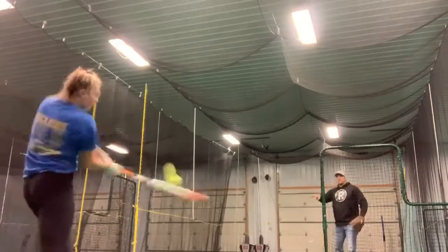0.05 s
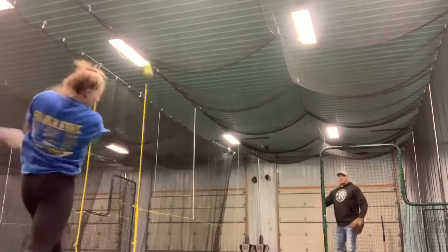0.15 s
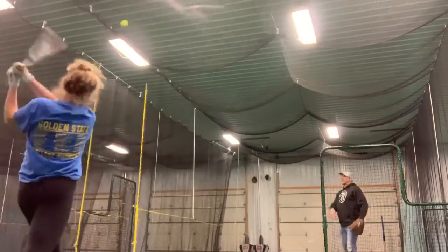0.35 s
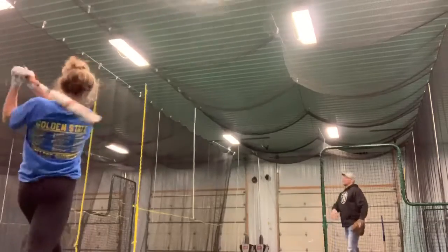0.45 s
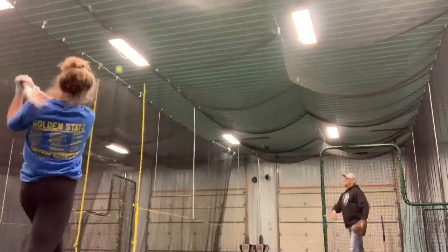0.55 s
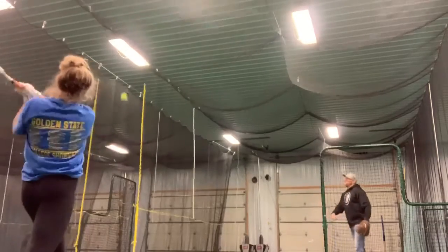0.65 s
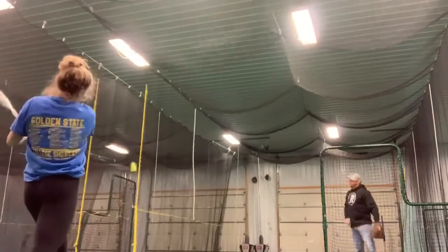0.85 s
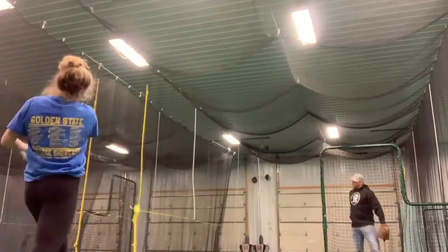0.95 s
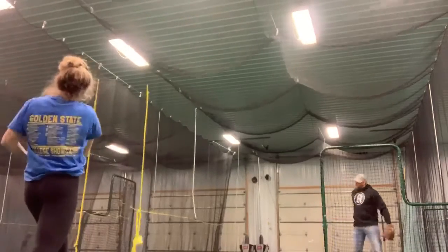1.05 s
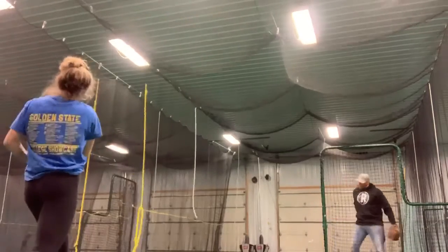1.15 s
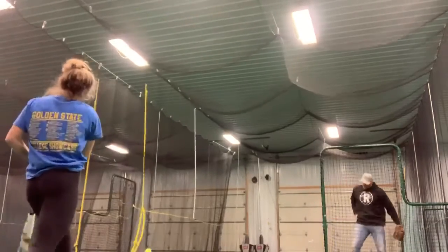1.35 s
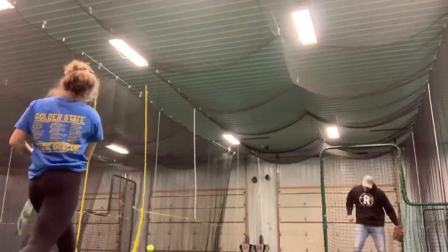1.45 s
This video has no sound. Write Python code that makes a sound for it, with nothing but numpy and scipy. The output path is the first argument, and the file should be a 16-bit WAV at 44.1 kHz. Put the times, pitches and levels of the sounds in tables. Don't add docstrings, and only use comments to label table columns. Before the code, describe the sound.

A bat cracks sharply against a ball in a large metal-walled hall, ringing with long echo

```python
import sys
import numpy as np
from scipy import signal
from scipy.io import wavfile
from scipy.ndimage import uniform_filter1d

SR = 44100
rng = np.random.default_rng(int(sys.argv[2]) if len(sys.argv) > 2 else 0)


def put_to_file(sound):
    columns = np.atleast_2d(sound).T
    safe = np.clip(columns, -1, 1)
    whole_steps = np.round(safe * 32767)
    wavfile.write(sys.argv[1], SR, whole_steps.astype(np.int16))


def elevation(decibels):
    levels = np.asarray(decibels, float)
    return 10 ** (levels / 20)


N = 66150
HIT_S = 0.2075


def rms_one(x):
    return x / np.sqrt(np.mean(x ** 2) + 1e-20)


def at_hz(points, hz):
    table = np.array(points)
    return np.interp(np.log(hz), np.log(table[:, 0]), table[:, 1])


def dying(start_s, rise_s, t60_s):
    t = np.maximum(np.arange(N) / SR - start_s, 0)
    return (1 - np.exp(-t / max(rise_s, 1e-5))) * elevation(-60 * t / t60_s)


def resonate(x, hz, width_hz):
    r = np.exp(-np.pi * width_hz / SR)
    top = np.array([1, 0, -1]) * (1 - r * r) / 2
    return signal.lfilter(top, [1, -2 * r * np.cos(2 * np.pi * hz / SR), r * r], x)


def resonant_noise(hz, width_hz):
    return rms_one(resonate(rng.standard_normal(N), hz, width_hz))


def focused(x, hz, width_hz):
    return rms_one(resonate(resonate(x, hz, width_hz), hz, 2 * width_hz))


def banded(spectrum, shape=lambda hz: 1):
    white = rng.standard_normal((2, N))
    edges = 22 * 2 ** np.arange(0, 9.1, 1 / 3)
    bands = []
    for k, (low, high) in enumerate(zip(edges, edges[1:])):
        hz = np.sqrt(low * high)
        sos = signal.butter(2, [low, high], "band", fs=SR, output="sos")
        bands.append((hz, elevation(at_hz(spectrum, hz)) * signal.sosfilt(sos, white[k % 2])))
    scale = np.std(sum(band for _, band in bands))
    return sum(band * shape(hz) for hz, band in bands) / scale


def struck(start_s, hz, t60_s, db, rise_s):
    return elevation(db) * dying(start_s, rise_s, t60_s) * np.sin(2 * np.pi * hz * (np.arange(N) / SR - start_s))


def bat():
    # pitch_hz [Hz], level_db [dB], t60_s [s]
    modes = [(99, -10.5, .06), (319, -4.5, 0.012), (576, -4, 0.011), (1084, -2.5, 0.033), (1417, -12, .02),
             (1860, -5.5, 0.029), (2340, -10.5, 0.033), (2770, -8.5, 0.018), (800, -22, 0.036),
             (4640, -39, 0.0071), (5852, -21, 0.0064), (5870, -25.5, 0.031), (7060, -11.5, 0.01),
             (8160, 0.5, 0.0021)]
    # delay_s [s], level_db [dB]
    reflections = [
        (0.016, -0.5),
        (0.021, -34),
        (0.033, -27),
        (0.042, -46),
        (0.054, -7.5),
    ]
    hit_db, lag_cycles, rise_cycles = -4, 1.6, 0.49
    blow = sum(struck(HIT_S + lag_cycles / hz, hz, t60, hit_db + db, rise_cycles / hz)
               for hz, db, t60 in modes)
    dull = signal.lfilter([0.4], [1, -0.6], blow)
    echoes = sum(elevation(db) * np.roll(dull, int(s * SR)) for s, db in reflections)
    return blow, echoes


def crack():
    return elevation(-24) * dying(HIT_S, 0.0005, 0.045) * resonant_noise(2500, 6000)


def flares():
    # time_s [s], level_db [dB], pitch_hz [Hz], length_s [s]
    swells = [(0.231, -25, 1192, 0.014), (0.249, -19.5, 1880, 0.009), (0.259, -10, 1213, 0.011),
              (0.478, -21.5, 1240, 0.014), (0.515, -25.5, 1201, 0.0097), (0.523, -33, 1850, 0.018),
              (0.588, -21.5, 1236, 0.0028), (0.644, -28, 1240, 0.002), (0.701, -30, 1212, 0.011),
              (0.706, -48, 1890, 0.011), (0.783, -29.5, 1208, 0.0027), (0.88, -42, 1220, 0.021)]
    t = np.arange(N) / SR
    return sum(elevation(db) * np.exp(-0.5 * ((t - s) / length) ** 2) * np.sin(2 * np.pi * hz * t)
               for s, db, hz, length in swells)


def wavering(hz, width_hz):
    steadiness = 0.5
    x = rng.standard_normal(N)
    x = resonate(resonate(x, hz, width_hz), hz, width_hz)
    level = abs(signal.hilbert(x)) + 0.2 * np.std(x)
    return rms_one(x / level ** steadiness)


def hall():
    # pitch_hz [Hz], level_db [dB per Hz]
    colour = [(88, -37), (150, -25.5), (488, -5.5), (794, -7), (1250, -4), (1410, -3), (1830, -4),
              (8130, -25), (9500, -67.5), (12400, -75.5), (20900, -120)]
    # pitch_hz [Hz], width_hz [Hz], level_db [dB]
    barrel_rings = [(1220, 47.5, -30), (1265.8, 30.4, -33.5), (500, 225, -43), (1063, 350, -32.5),
                    (1890, 100, -42), (2430, 120, -51)]
    # pitch_hz [Hz], t60_s [s]
    decay = [(200, 1.96), (600, 1.71), (1200, 1.465), (2500, 1.094), (5000, 1.065), (9000, 0.68)]
    start_s, rise_s, ring_t60_s = HIT_S + 0.012, 0.005, 1.664
    wash = banded(colour, lambda hz: dying(start_s, rise_s, at_hz(decay, hz)))
    rings = sum(elevation(db) * wavering(hz, width) for hz, width, db in barrel_rings)
    tail = elevation(-14) * wash + elevation(11.5) * rings * dying(start_s, rise_s, ring_t60_s)
    return tail - 0.85 * resonate(tail, 1440, 220)


def swing():
    # pitch_hz [Hz], level_db [dB per Hz]
    colour = [(150, -13), (500, -4.5), (1500, -12), (3500, -6.5), (6000, -12), (9000, -12.5)]
    peak_s, rise_s = 0.11, 0.09
    t = np.arange(N) / SR
    swish = elevation(-55) * np.clip((t - peak_s) / rise_s + 1, 0, 1) * banded(colour)
    rush_db, climb_db_per_s = -25, 950
    rush_noise = focused(rng.standard_normal(N), 2100, 1400)
    rush = elevation(rush_db + climb_db_per_s * np.minimum(t - HIT_S, 0)) * dying(0.183, 0.004, 11) * rush_noise
    push = elevation(-33) * dying(0.177, 0.026, 0.36) * resonant_noise(130, 150)
    return (swish + rush) * (t < HIT_S + 0.002) + push


def netting():
    # start_s [s], level_db [dB], pitch_hz [Hz], width_hz [Hz], t60_s
    # [s]
    brushes = [(0.332, -32, 8000, 800, 0.021), (0.3794, -31, 7520, 1240, 0.087),
               (0.382, -27, 5000, 2000, .06), (0.563, -46.5, 8000, 2590, 0.58),
               (.5866, -40, 8330, 1500, 0.22), (0.585, -34.5, 4820, 2000, 0.23),
               (0.612, -40, 6200, 1500, 0.059), (.65, -46.5, 5200, 2470, 0.62),
               (1.1046, -48, 3480, 4960, 0.034), (1.112, -50.5, 2400, 2320, 0.95),
               (1.088, -59.5, 7500, 4000, 0.38), (1.327, -44, 2900, 4760, 0.019),
               (1.3395, -39, 2940, 4650, 0.033), (1.343, -46, 3240, 1550, 0.64),
               (1.36, -60, 4370, 4930, 0.68), (0.228, -23.5, 6100, 6000, .08)]
    grains_per_s = 910
    out = 0
    for s, db, hz, width_hz, t60 in brushes:
        grains = (rng.random(N) < grains_per_s / SR) * rng.standard_normal(N)
        grains = grains + 0.45 * rng.standard_normal(N)
        out = out + elevation(db) * dying(s, t60 * 0.0067, t60) * focused(grains, hz, width_hz)
    return out


def thuds():
    # start_s [s], peak_db [dB], pitch_hz [Hz], t60_s [s]
    knocks = [
        (1.105, -48.5, 500, 0.06),
        (1.3303, -18, 505, 0.0049),
        (1.3427, -26.5, 800, 0.0083),
        (1.347, -46, 175, 0.016),
        (1.397, -25.5, 467, 0.011),
        (1.433, -34.5, 290, 0.025),
    ]
    # pitch_hz [Hz], level_db [dB per Hz]
    answer = [(80, -0.5), (250, 0), (500, -3), (1000, -12.5), (2500, -33.5), (9000, -44.5)]
    rise_cycles = 0.4
    dull = sum(struck(s, hz, t60, db + 6.5, rise_cycles / hz) for s, db, hz, t60 in knocks)
    return dull + elevation(-35.5) * dying(1.301, 0.079, 1.32) * banded(answer)


def booms():
    # start_s [s], level_db [dB], pitch_hz [Hz], width_hz [Hz], t60_s [s]
    sheets = [
        (0, -56, 301, 118.7, 4.3),
        (0, -52, 117, 50, .8),
        (.58, -43.5, 80, 48.2, 2.4),
    ]
    return sum(elevation(db) * dying(s, t60 * 0.013, t60) * focused(rng.standard_normal(N), hz, width)
               for s, db, hz, width, t60 in sheets)


def floor():
    # pitch_hz [Hz], level_db [dB per Hz]
    colour = [(15, -42), (25, 0.5), (146, -6.5), (315, -38), (506, -17.5), (1470, -18), (2480, -24),
              (8390, -37), (9500, -58.5), (12400, -99.5), (20900, -120)]
    return elevation(-56.5) * banded(colour) + elevation(-56) * resonant_noise(88, 45)


def scene():
    blow, echoes = bat()
    hit = blow + crack() + elevation(-6) * echoes
    ringing = elevation(3.5) * flares() + hall()
    return (hit + ringing + swing() + netting() + thuds() + booms() + floor())[None]


def treble_dropouts(x):
    # pitch_hz [Hz], share [0 to 1]
    holes = [(3000, 0.0094), (5000, 0.14), (6300, 0.1), (7200, 0.9), (8200, 0.11), (8800, 0.34),
             (9300, 0.93)]
    hole_db, quiet_db = -26, 31.5
    hz, _, z = signal.stft(np.pad(x, (0, 2048), "reflect"), SR, nperseg=1024, boundary="even")
    band = np.arange(len(hz)) // 5
    luck = uniform_filter1d(rng.standard_normal((band[-1] + 1, z.shape[1])), size=5, axis=1)
    luck = np.argsort(np.argsort(luck, axis=1), axis=1)[band] / z.shape[1]
    level_db = 10 * np.log10(uniform_filter1d(abs(z) ** 2, size=24, axis=0) + 1e-14)
    below_usual_db = np.median(level_db, axis=1, keepdims=True) - level_db
    odds = at_hz(holes, hz + 1)[:, None] * elevation(below_usual_db) ** (6 / quiet_db)
    dropped = (luck < odds) & (hz > 2500)[:, None]
    return signal.istft(z * np.where(dropped, elevation(hole_db), 1), SR, nperseg=1024)[1][:N]


def roll_off(x):
    return signal.sosfilt(signal.butter(12, 10120, fs=SR, output="sos"), x)


def record(dry):
    duck_db, attack_s, hold_s, recover_s = -15, 0.016, 0.094, 0.38
    t = np.arange(N) / SR - HIT_S - 0.006
    duck = np.clip(t / attack_s, 0, 1) * np.clip(1 - (t - hold_s) / recover_s, 0, 1)
    treble_cut = signal.cheby2(16, 100, 10800, fs=SR, output="sos")
    cut = signal.sosfilt(treble_cut, dry * elevation(duck_db * duck))
    mix = treble_dropouts(cut[0])[None]
    return roll_off(mix)


dry = scene()
out = record(dry)
put_to_file(out)
```